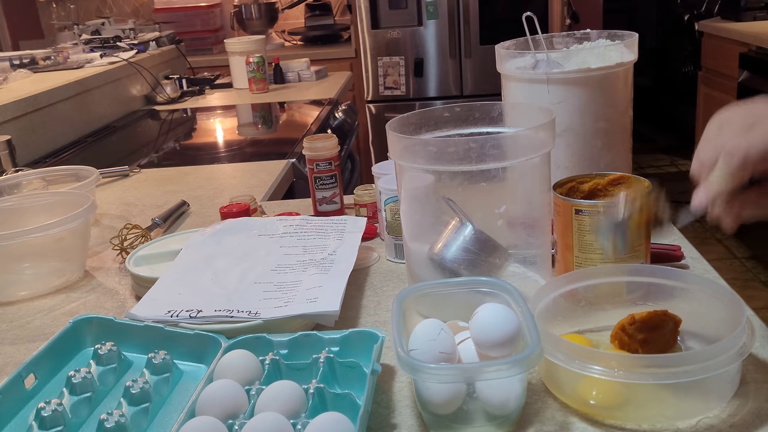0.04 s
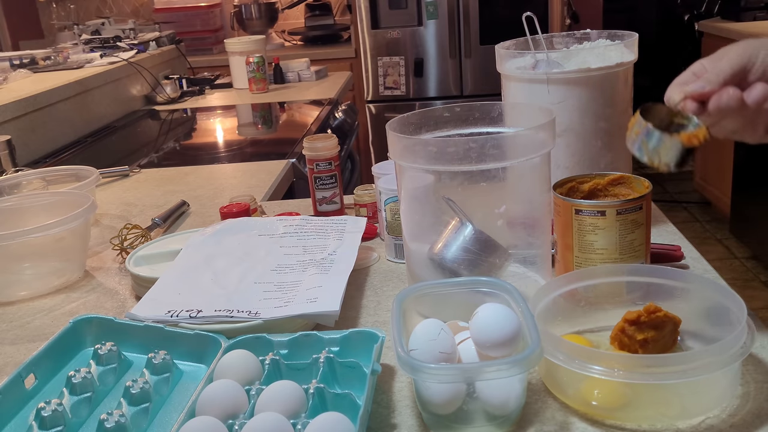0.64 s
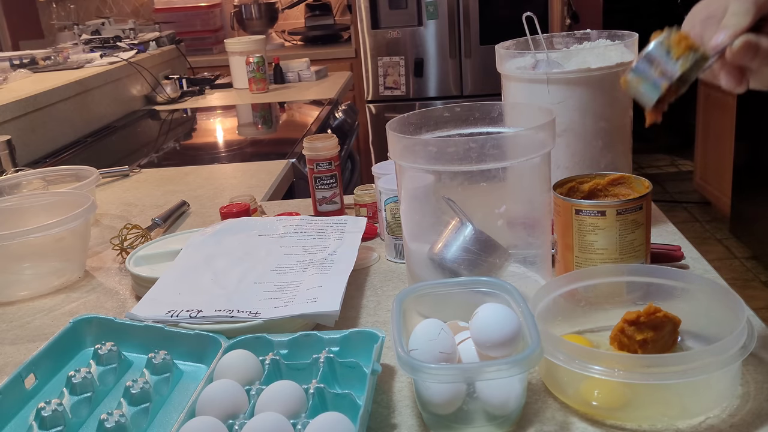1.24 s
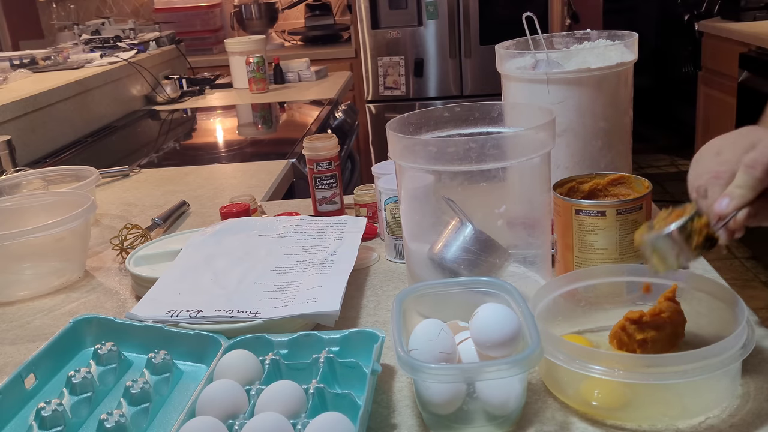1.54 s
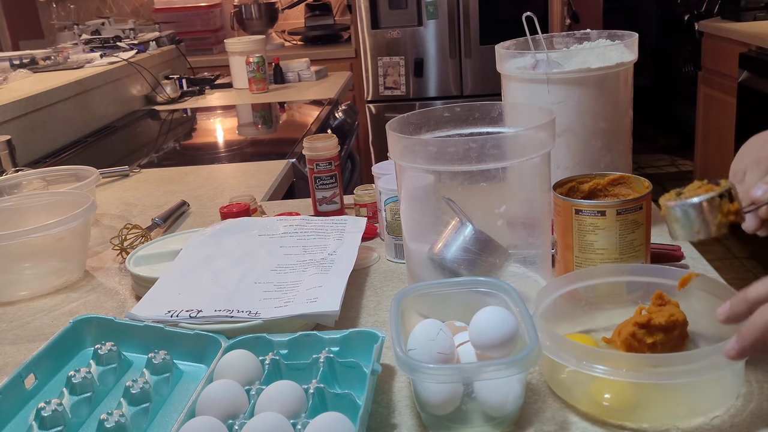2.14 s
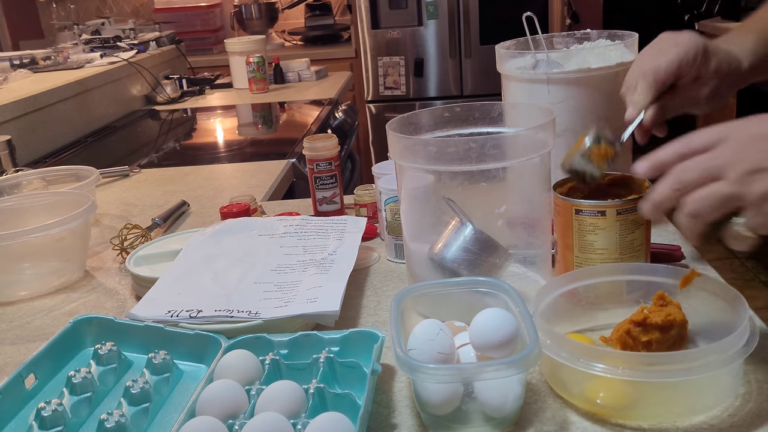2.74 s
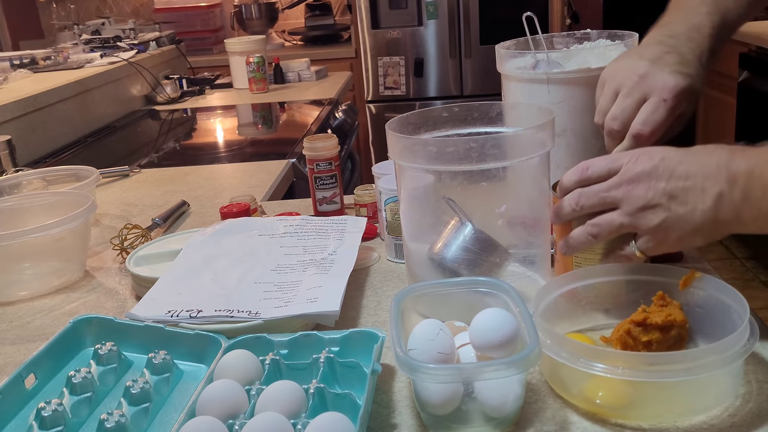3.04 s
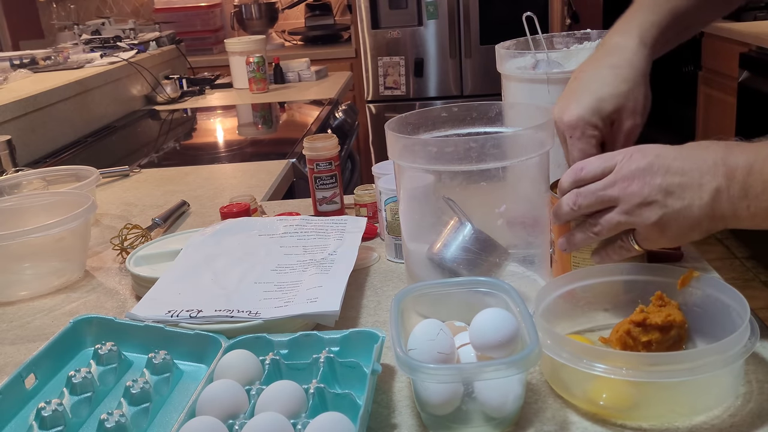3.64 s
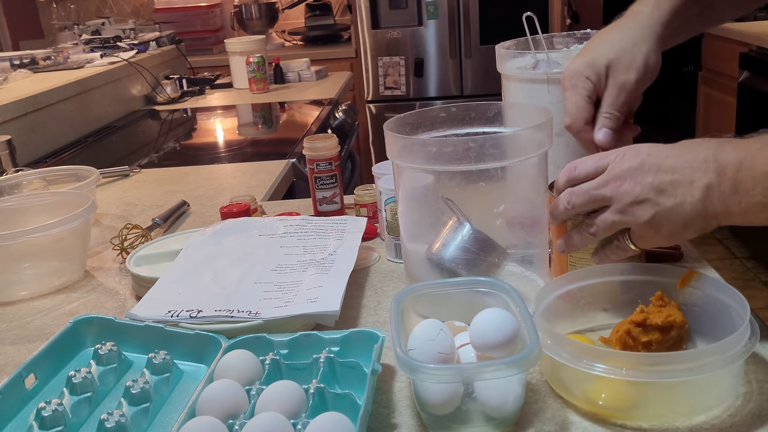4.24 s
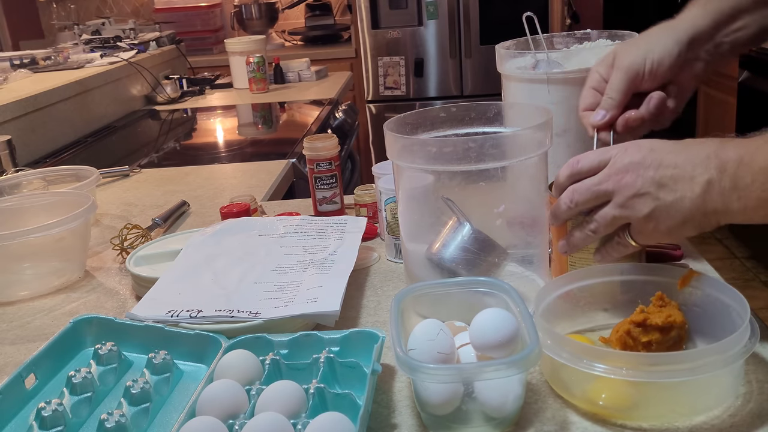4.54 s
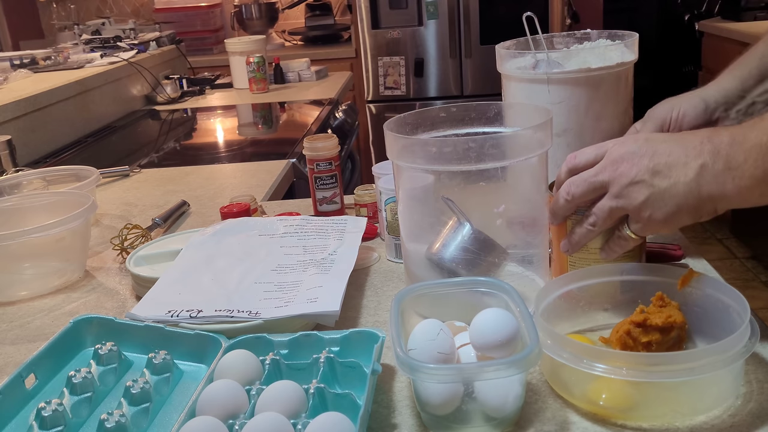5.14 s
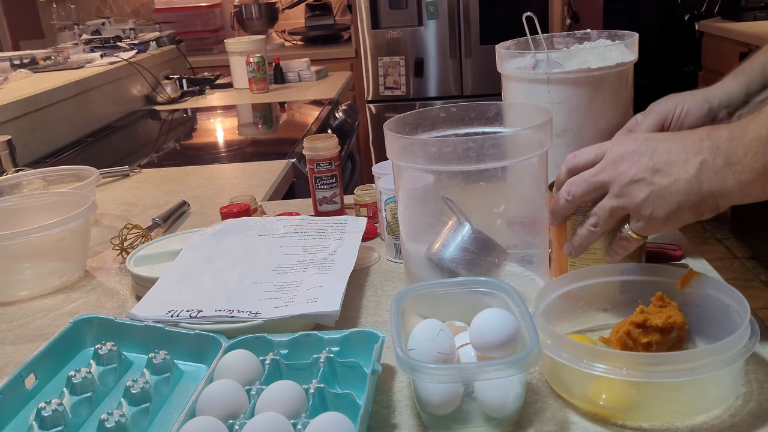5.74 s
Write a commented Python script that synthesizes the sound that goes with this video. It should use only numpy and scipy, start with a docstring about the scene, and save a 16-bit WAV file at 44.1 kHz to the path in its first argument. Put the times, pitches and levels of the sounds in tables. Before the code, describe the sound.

Sharp taps of a steel cup on plastic with small wet smacks, then five hollow, clinking knocks in a can in a quiet kitchen.

```python
"""A steel measuring cup is rapped on a plastic mixing bowl to shake out thick puree, then knocks five
times in a tin can on the counter. Each impact is a short force pulse that excites the damped modes
of the bodies in contact; the air in the can adds a hollow note, and the puree smacks and rubs.
A small kitchen reverberates. Two microphones hear the work from the right, over a refrigerator's
hum from the left, a faint whine, room air and hiss."""
import sys
import numpy as np
from scipy import signal
from scipy.fft import rfft, irfft, next_fast_len
from scipy.io import wavfile
from scipy.ndimage import uniform_filter1d, map_coordinates

SR = 44100
rng = np.random.default_rng(int(sys.argv[2]) if len(sys.argv) > 2 else 0)


def persist_wave(psi):
    """Save psi, clipped to +-1, as 16-bit WAV."""
    counts = np.round(np.clip(psi, -1, 1) * 32767).astype(np.int16)
    wavfile.write(sys.argv[1], SR, np.atleast_2d(counts).T)


N = 260190
TIME, HIT_TIME = np.arange(N) / SR, np.arange(SR // 2) / SR

# raps and rebounds: t/s, level/dB, contact hardness f/Hz, favoured resonance f/Hz, lip clink level/dB
BOWL_HITS = [(1.9699, -4.5, 4200, 1010, -24), (1.9833, -15, 2180, 950, -32), (2.0372, -25, 2000, 1300, -44),
             (2.096, -25, 1300, 900, -40), (2.157, -30, 1090, 700, -53), (2.3461, -7.5, 600, 635, -29.5),
             (2.365, -21, 700, 850, -56)]
# spectra of the body's dull first swing and of the metal edge's click: f/Hz, relative level/dB
BOWL_BODY = [(60, -33), (150, -0.5), (300, -1), (430, -6.5), (600, 4.5), (780, -4.5), (950, 3.5), (1330, 2),
             (1620, -7), (1860, 1), (2100, -13), (2420, -10), (3000, -16.5), (4200, -15.5), (5500, -20),
             (9000, -26), (16000, -28.5)]
BOWL_CLICK = [(500, -29), (1300, 13.5), (1700, 4.5), (2300, 1), (3000, -2), (3900, 0.5), (4700, -5),
              (5500, -4), (8000, -9), (12000, -9.5), (16000, -12)]
# modes of the cup: f/Hz, relative level/dB, T60/s
CUP_MODES = [(296, -8, .25), (330, -10, .35), (477, -13, .2), (628, -6, .17), (689, -12, .3),
             (884, -1.5, .3), (965, -5, .3), (1010, -10, .16), (1087, -10, .38), (1154, -5, .32),
             (1215, -9, .2), (1257, -1, .33), (1292, -10, .3), (1335, -13, .25), (1416, -5, .36),
             (1503, -13, .18), (1785, -18, .2), (1885, -15, .33), (2137, -19, .21), (2420, -15, .24),
             (2977, -14, .1), (3850, -10, .05), (4066, -16, .28), (4230, -17, .14), (4400, -13, .09),
             (4580, -15, .08), (4915, -16, .08)]
# reflections from surfaces near the bowl: delay t/s, gain
BOWL_ECHOES = [(.0021, 0.28), (.0058, 0.34), (0.0106, 0.22), (0.0186, 0.37)]
def cup_on_bowl():
    """Impact excitation: the cup strikes the rim, rebounds and rings, damped by hand and puree."""
    raps, strikes = contacts(BOWL_HITS, offsets_db=(-3.5, -24.5, -22.5), db_per_octave=(5.5, 4.5, 5.5))
    direct = blows(raps, BOWL_BODY, BOWL_CLICK, click_delay_s=0.00078, click_rise_s=0.00097,
                   thump_hz=104, thump_rise_s=0.0053)
    direct += lip_clinks(BOWL_HITS)
    ring = ringing(strikes, np.vstack([CUP_MODES, wall_modes()]), attack_s=0.0014)
    near = echoes(direct, BOWL_ECHOES, cutoff_hz=3030) + ring + lead_in_tone()
    return from_right(near) + kitchen(direct, wet_db=-1.5, treble_db=-7, build_s=0.0068)


def wall_modes(count=70, low_hz=2100, high_hz=6960):
    """A thin wall has dense upper modes, weaker with each octave: rows of f/Hz, level/dB, T60/s."""
    place, life = rng.uniform(size=(count, 2)).T
    hz = low_hz + (high_hz - low_hz) * (np.arange(count) + place) / count
    return np.column_stack([hz, -25.5 - 4 * np.log2(hz / low_hz), 0.18 * (.5 + life)])


# bright modes of the cup's lip: f/Hz, relative level/dB, T60/s
LIP_MODES = [(2616, -2, 0.027), (2850, -11, 0.035), (3030, -4, 0.023), (3045, -5, 0.03), (3320, -6, 0.014),
             (3810, -12.5, 0.021), (3950, -14.5, 0.027), (4520, -7, .025)]
def lip_clinks(hits):
    """Heavily damped modes clink; grip and point of contact detune them from blow to blow."""
    track, t = np.zeros((2, N)), HIT_TIME
    hz, level, t60 = np.transpose(LIP_MODES)[:, :, None]
    for s, _, _, _, clink_db, *_ in hits:
        pitch = hz * (1 + 0.0073 * rng.standard_normal(hz.shape))
        phase = rng.uniform(0, 2 * np.pi, (2, len(hz), 1))
        waves = np.sin(2 * np.pi * pitch * t + phase) * amp(clink_db + level - 60 * t / t60)
        add(track, s, waves.sum(axis=1))
    return track


def lead_in_tone(length_s=0.029, hz=1405):
    """Phase modulation roughens a faint tone and its octave, which swell into the first rap."""
    track, t = np.zeros(N), HIT_TIME
    swell = t / length_s * (t < length_s)
    phase = 2 * np.pi * hz * t + .5 * wobble(370)[:len(t)]
    tone = np.sin(phase) + amp(-5) * np.sin(2 * phase)
    add(track, BOWL_HITS[0][0] - length_s, amp(-31.5) * swell * tone)
    return track


# knocks in the can: the columns of BOWL_HITS, then hollow note level/dB, f/Hz
CAN_HITS = [(5.0083, -16, 1980, 1010, -39, -26, 635), (5.2086, -14, 2480, 1640, -24.5, -29, 643),
            (5.419, -6, 2360, 740, -29, -22.5, 637), (5.6001, -6, 1920, 920, -31, -20, 573),
            (5.7608, -4.5, 2140, 825, -23, -22.5, 613)]
# spectra of the can's dull first swing and of its edge click: f/Hz, relative level/dB
CAN_BODY = [(60, -45), (220, -16), (305, -3.5), (370, -4.5), (450, -1), (600, 1), (690, -5.5), (780, 3),
            (900, -12), (1030, -5), (1300, -10.5), (1580, -6.5), (2000, -9.5), (2850, -37), (4500, -27),
            (16000, -24)]
CAN_CLICK = [(500, -7), (1100, 7), (1580, -0.5), (2100, -1), (2650, 2), (3050, 3), (3600, -4), (4500, -5),
             (5700, -3), (7300, -12), (9500, -5.5), (12000, -3), (14500, -11), (16000, -6.5)]
# modes of the can: f/Hz, relative level/dB, T60/s
CAN_MODES = [(300, -7, .22), (356, -9, .18), (440, -5, .17), (511, -12, .2), (557, -7, .18), (604, -6, .26),
             (630, -3, .2), (690, -12, .22), (760, -8, .2), (777, 0, .27), (822, -4, .18), (974, -2, .22),
             (1040, -6, .23), (1114, -7, .22), (1157, -6, .2), (1297, -13, .25), (1529, -15, .22),
             (1596, -18, .24), (1750, -20, .24), (2046, -26, .22), (2799, -25, .2)]
# reflections from surfaces near the can: delay t/s, gain
CAN_ECHOES = [(.0051, .85), (.0094, .35), (.0139, .35)]
def cup_in_can():
    """Impact excitation of a shell: the cup knocks in the half-full can, further right than the bowl."""
    knocks, strikes = contacts(CAN_HITS, offsets_db=(-12.5, -30.5, -24), db_per_octave=(3, 13, -9))
    direct = blows(knocks, CAN_BODY, CAN_CLICK, click_delay_s=-0.000916, click_rise_s=0.0012,
                   thump_hz=82, thump_rise_s=0.016)
    ring = ringing(strikes, CAN_MODES, attack_s=0.0021)
    metal = echoes(direct, CAN_ECHOES, cutoff_hz=2540) + ring + lip_clinks(CAN_HITS)
    near = panned(right_db=1.5) * metal + hollow_notes()
    return from_right(near) + kitchen(direct, wet_db=2.5, treble_db=-4, build_s=0.0024)


def hollow_notes(t60_s=0.09):
    """Cavity resonance: the air in the can sounds one note a knock, its pitch set by the cup's place."""
    track, t = np.zeros(N), HIT_TIME
    for s, *_, db, hz in CAN_HITS:
        add(track, s, np.sin(2 * np.pi * hz * t) * amp(db - 60 * t / t60_s))
    return panned(right_db=8) * track


def contacts(hits, offsets_db, db_per_octave, firm_hz=2000):
    """Strength and contact hardness set the levels of click, thump and ring (each triple's order)."""
    impacts, strikes = [], []
    for s, db, hard_hz, favoured_hz, *_ in hits:
        octaves = np.log2(hard_hz / firm_hz)
        click_db, thump_db, ring_db = db + np.array(offsets_db) + octaves * np.array(db_per_octave)
        impacts.append((s, db, click_db, thump_db, hard_hz, favoured_hz))
        strikes.append((s, ring_db))
    return impacts, strikes


def blows(impacts, body, click, click_delay_s, click_rise_s, thump_hz, thump_rise_s):
    """Forced response: each blow pushes the body, chatters at the metal edge and thumps the counter."""
    track, t = np.zeros((2, N)), HIT_TIME
    knock, edge = pulse(body), pulse(click)
    thump = np.sin(2 * np.pi * thump_hz * t) * surge(thump_rise_s)
    for s, knock_db, click_db, thump_db, hard_hz, favoured_hz in impacts:
        # the point of contact favours one resonance, and puree softens the blow
        contact = lambda hz: (1 + 0.97 * resonance(hz, favoured_hz, q=2.2)) / (1 + 1j * hz / hard_hz)
        add(track, s, amp(knock_db) * filtered(knock, contact) + amp(thump_db) * thump)
        # short waves differ at the two microphones
        chatter = rng.standard_normal((2, len(t))) * surge(click_rise_s)
        edge_click = signal.fftconvolve(chatter, edge[None] / np.linalg.norm(edge), axes=1)
        add(track, s + click_delay_s, amp(click_db) / 2 * edge_click)
    return track


def ringing(strikes, modes, attack_s, one_radian_hz=1460):
    """Free vibration: modes decay exponentially, excited in a new balance by each strike."""
    track, t = np.zeros((2, N)), HIT_TIME
    hz, level, t60 = np.transpose(modes)[:, :, None]
    # higher modes scatter more in phase between the microphones
    phase = rng.standard_normal((2, len(hz), 1)) * hz / one_radian_hz
    waves = np.sin(2 * np.pi * hz * t + phase) * amp(level - 60 * t / t60) * (1 - np.exp(-t / attack_s))
    for s, db in strikes:
        add(track, s, amp(db + rng.standard_normal(len(hz))) @ waves)
    return track


# lumps of puree landing: t/s, level/dB
LUMPS = [(0.514, -38.5), (2.099, -35)]
# parts of a landing, from low plop to sticky top: f/Hz, relative level/dB, duration t/s
LUMP_PARTS = [(303, 5, 0.022), (660, -4, 0.055), (1480, -7.5, 0.022)]
# puree peeling off the cup: t/s, level/dB, f/Hz
SMACKS = [(0.53, -36, 2020), (1.0267, -39, 2780), (1.03, -48, 5660), (2.0971, -24.5, 1740),
          (2.098, -46, 3260), (2.156, -34.5, 1700), (2.407, -41, 1740), (2.4154, -27, 1830),
          (2.4175, -50, 4600)]
# strokes of hand and cup through the puree: centre t/s, level/dB, f/Hz, half-width t/s
RUBS = [(0.11, -54.5, 1690, 0.11), (0.903, -50, 1390, 0.1), (1.034, -57, 3600, 0.016),
        (3.294, -53, 520, 0.032), (3.647, -49.5, 1390, 0.018), (3.88, -59, 1000, 0.22),
        (4.268, -53, 4350, 0.047), (4.25, -58, 4700, 0.015), (4.274, -48, 255, 0.031)]
def puree(smack_s=0.0055):
    """Impulsive noise: wet smacks are clusters of tiny pops; rubbing is a soft swell of finer grains."""
    track, t = np.zeros(N), HIT_TIME
    landings = [(s, db + part_db, pitch, length)
                for s, db in LUMPS for pitch, part_db, length in LUMP_PARTS]
    peelings = [(s, db, pitch, smack_s) for s, db, pitch in SMACKS]
    for s, db, pitch, length in landings + peelings:
        fade = (1 - np.exp(-t / 0.00031)) * np.exp(-2 * t / length)
        spikes = rng.standard_normal(len(t)) ** 3
        pops = fade * filtered(spikes, lambda hz: resonance(hz, pitch, q=2) ** 2)
        add(track, s, amp(db) * pops * np.linalg.norm(fade) / np.linalg.norm(pops))
    for s, db, pitch, half_width in RUBS:
        band = lambda hz: np.abs(resonance(hz, pitch, q=1.1)) ** 2
        sheen = lambda hz: amp(-15.5) * np.abs(resonance(hz, 2.5 * pitch, q=1.7)) ** 2
        grains = unit(filtered(rng.standard_normal(N) ** 3, lambda hz: band(hz) + sheen(hz)))
        track += amp(db) * grains * np.exp(-((TIME - s) / half_width) ** 2)
    return from_right(track) + kitchen(track, wet_db=-6, treble_db=2, build_s=0.002)


def from_right(x, lead_s=8 / SR, right_db=0.8):
    """Path difference: sound from the right reaches that microphone first and a little louder."""
    right = lambda hz: amp(right_db / 2) * np.exp(1j * np.pi * hz * lead_s)
    return filtered(x, lambda hz: np.array([1 / right(hz), right(hz)]))


def echoes(x, surfaces, cutoff_hz):
    """Early reflection: nearby containers and the counter add delayed, dulled copies."""
    copies = lambda hz: sum(gain * np.exp(-2j * np.pi * hz * delay) for delay, gain in surfaces)
    return x + filtered(x, lambda hz: copies(hz) / (1 + 1j * hz / cutoff_hz))


# reverberation time: f/Hz, T60/s
KITCHEN_T60 = [(100, 0.21), (400, 0.32), (1200, 0.29), (2000, 0.3), (4000, 0.29), (9000, 0.21),
               (15000, 0.025)]
# likeness of the room's field at the two microphones: f/Hz, correlation
ROOM_CORRELATION = [(60, 0.74), (150, 1), (290, 0.15), (640, -0.41), (1350, -0.84), (2200, 0.11),
                    (3500, -0.12), (7000, -0.29)]
def kitchen(x, wet_db, treble_db, build_s):
    """Reverberation: the diffuse field builds for a moment, then dies away, fastest in the top treble."""
    size = len(HIT_TIME)
    noise = stereo_noise([(1000, 0)], ROOM_CORRELATION, size)
    hz, t, frames = signal.stft(noise, SR, nperseg=256)
    decay = amp(-60 * t / along(KITCHEN_T60, hz)[:, None])
    spectrum = rfft(signal.istft(frames * decay, SR, nperseg=256)[1][:, :size])
    # so many room modes overlap that no single band stands out
    band_power = np.abs(uniform_filter1d(np.abs(spectrum) ** 2, size=40, axis=1))
    onset = 1 - np.exp(-(HIT_TIME / build_s) ** 2)
    tail = (irfft(spectrum / np.sqrt(band_power)) * onset)[:, :SR // 3]
    tail *= np.sqrt(2) / np.linalg.norm(tail)
    reverb = signal.fftconvolve(np.atleast_2d(x), tail, axes=1)[:, :N]
    return filtered(reverb, lambda hz: amp(wet_db + along([(1000, 0.023), (3000, treble_db)], hz)))


# tones of the motor and the mains: f/Hz, rms level/dB
HUM_TONES = [(58.2, -59.5), (116.3, -55), (119.6, -64.5), (174, -50), (232.5, -59), (294, -74.5),
             (436, -67)]
# slow sway, of which the hum takes a share about the median: t/s, level/dB
HUM_SWAY = [(0.0, -46), (0.62, -49), (0.95, -49), (1.12, -58), (1.3, -46.5), (1.9, -50), (2.25, -53.5),
            (2.56, -57), (3.1, -55.5), (3.75, -48), (3.95, -56.5), (4.15, -51), (4.38, -56), (4.52, -50),
            (4.85, -51.5), (5.31, -58), (5.67, -50), (5.9, -51.5)]
def refrigerator(left_lead_s=0.00044, sway_share=0.72):
    """Beating: wavering motor tones interfere with the mains hum, arriving first on the left."""
    arrival = TIME + np.array([[left_lead_s / 2], [-left_lead_s / 2]])
    hum = sum(amp(db + 2.17 * wobble(9.7)) * wavering_tone(hz, arrival, rate=7.8) for hz, db in HUM_TONES)
    s, sway_db = np.transpose(HUM_SWAY)
    return amp(sway_share * np.interp(TIME, s, sway_db - np.median(sway_db))) * hum


# faint tones: start t/s, end t/s, f/Hz, rms level/dB
WHINES = [(-0.1, 4.35, 1450, -66.5), (-0.1, 4.3, 1385, -69), (4.2, 5.9, 1470, -73)]
def whine(rise_s=0.68, fall_s=0.045):
    """Amplitude and phase modulation: thin tones, as of a small motor, come and go on the right."""
    track = np.zeros(N)
    for start, end, hz, db in WHINES:
        gate = np.clip((TIME - start) / rise_s, 0, 1) * np.clip((end - TIME) / fall_s, 0, 1)
        track += gate * amp(db + 2.4 * wobble(5.65)) * wavering_tone(hz, TIME, rate=6.1)
    return panned(right_db=8) * track


# spectra of room air and microphone hiss: f/Hz, relative level/dB
AIR = [(20, -8), (59, -2.5), (86, -6.5), (114, -4.5), (176, -0.5), (264, -3.5), (400, -3), (640, -4.5),
       (970, -10.5), (1250, -9.5), (1440, -9.5), (1620, -19), (2300, -23), (4000, -31.5)]
HISS = [(1500, -11.5), (2400, 1), (3200, 7.5), (4000, 5), (5200, 6), (6500, -8), (7800, -6.5), (8700, 4),
        (10400, 1), (11150, 13.5), (11800, 1), (13600, 8), (15500, 1), (16200, -20)]
def air_and_hiss():
    """Noise floor: gently stirring room air, and steady microphone hiss that is stronger on the left."""
    stir = amp(.7 * wobble(3) + .6 * wobble(11))
    air = amp(-45.5) * stir * stereo_noise(AIR, ROOM_CORRELATION, N)
    hiss = amp([[-53], [-55.2]]) * stereo_noise(HISS, [(10000, 0.022)], N)
    return air + hiss


def amp(db):
    """Decibels to amplitude ratio."""
    return 10 ** (np.asarray(db) / 20)


def unit(x):
    """Normalisation to rms 1."""
    return x / np.sqrt(np.mean(x ** 2) + 1e-20)


def panned(right_db):
    """Level difference: left and right gains for a sound this much louder on the right."""
    return amp([[-right_db / 2], [right_db / 2]])


def along(points, hz):
    """Interpolation of (f/Hz, value) points on a logarithmic frequency axis."""
    f, values = np.transpose(points)
    return np.interp(np.log(hz + 1), np.log(f + 1), values)


def wobble(rate):
    """Smooth random modulation with rate knots a second."""
    return map_coordinates(rng.standard_normal(int(N * rate / SR) + 4), [TIME * rate])


def wavering_tone(hz, t, rate):
    """Random phase modulation of a sinusoid of rms 1."""
    return np.sqrt(2) * np.sin(2 * np.pi * hz * t + .5 * wobble(rate))


def surge(rise_s):
    """Critically damped envelope, peaking at 1 after rise_s."""
    return HIT_TIME / rise_s * np.exp(1 - HIT_TIME / rise_s)


def filtered(x, response):
    """Linear filtering: the spectrum of x times a complex frequency response."""
    n = x.shape[-1]
    padded = next_fast_len(n + SR // 4)
    return irfft(rfft(x, padded) * response(np.fft.rfftfreq(padded, 1 / SR)), padded)[..., :n]


def resonance(hz, centre, q):
    """Band-pass response of a damped oscillator."""
    return 1j * hz * centre / q / (centre ** 2 - hz ** 2 + 1j * hz * centre / q)


def pulse(spectrum, size=4096):
    """Minimum phase: the shortest causal pulse with this spectrum, peak 1."""
    cepstrum = irfft(np.log(amp(along(spectrum, np.fft.rfftfreq(size, 1 / SR)))))
    cepstrum[1:size // 2] *= 2
    cepstrum[size // 2 + 1:] = 0
    wave = irfft(np.exp(rfft(cepstrum)))
    return np.pad(wave / np.abs(wave).max(), (0, len(HIT_TIME) - size))


def stereo_noise(spectrum, correlation, size):
    """Partial coherence: noise of rms 1 whose left-right correlation depends on frequency."""
    angle = lambda hz: np.arccos(np.clip(along(correlation, hz), -1, 1)) / 2
    response = lambda hz: amp(along(spectrum, hz)) * [np.cos(angle(hz)), np.sin(angle(hz))]
    mid, side = filtered(rng.standard_normal((2, size)), response)
    return unit(np.array([mid + side, mid - side]))


def add(track, s, sound):
    """Superpose a sound on a track at time s."""
    start = max(round(s * SR), 0)
    track[..., start:start + sound.shape[-1]] += sound[..., :N - start]


def scene():
    """Superposition of all sources heard at the counter."""
    return cup_on_bowl() + cup_in_can() + puree() + refrigerator() + whine() + air_and_hiss()


def record(dry):
    """Band limiting: nothing above 15.8 kHz passes."""
    return filtered(dry, lambda hz: hz < 15800)


dry = scene()
out = record(dry)
persist_wave(out)
```